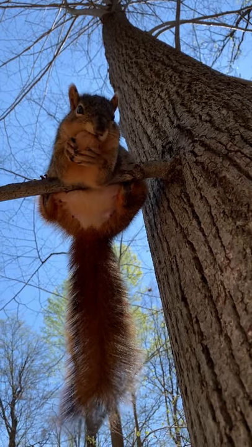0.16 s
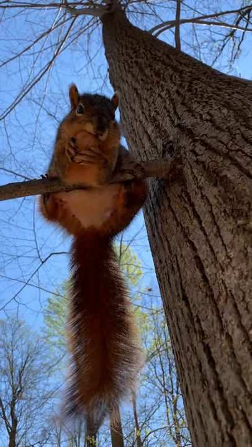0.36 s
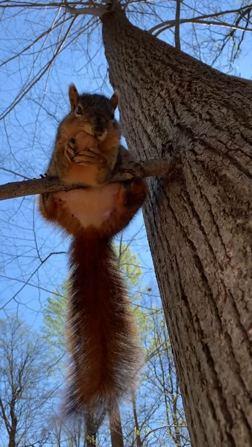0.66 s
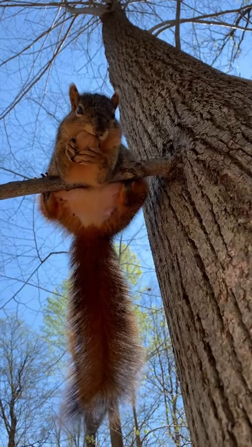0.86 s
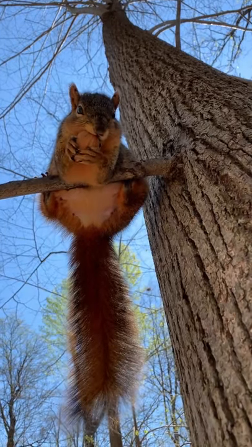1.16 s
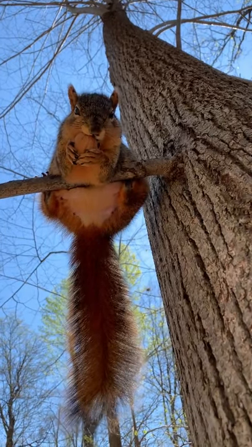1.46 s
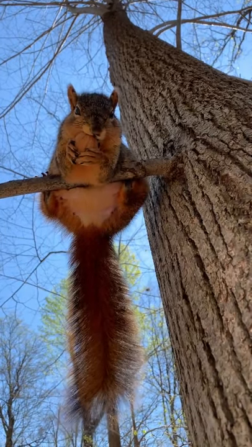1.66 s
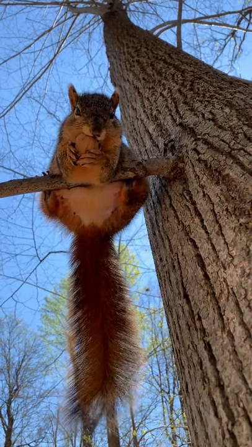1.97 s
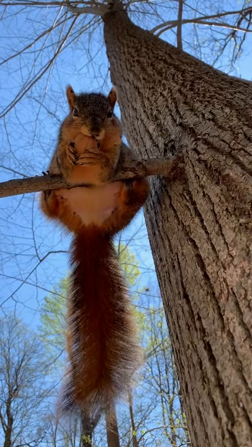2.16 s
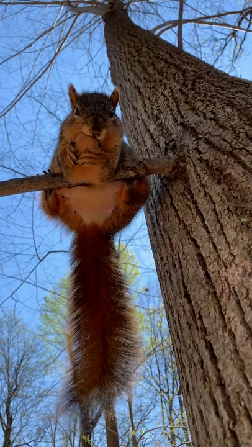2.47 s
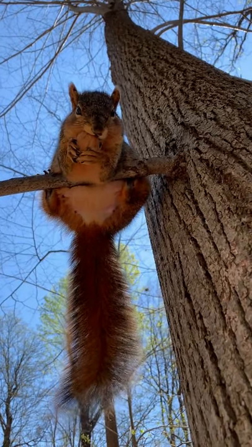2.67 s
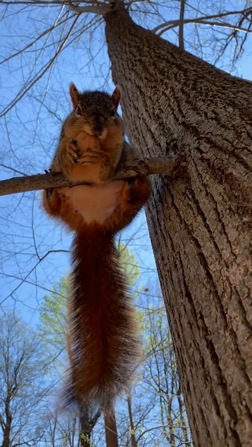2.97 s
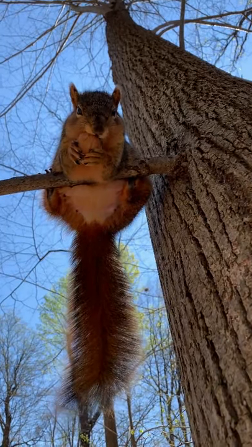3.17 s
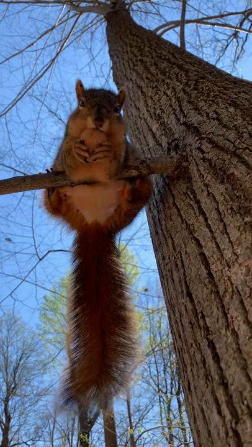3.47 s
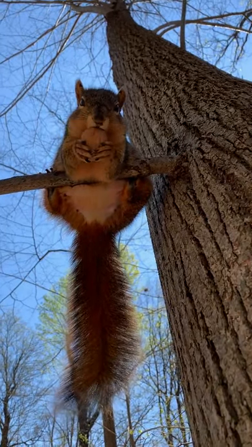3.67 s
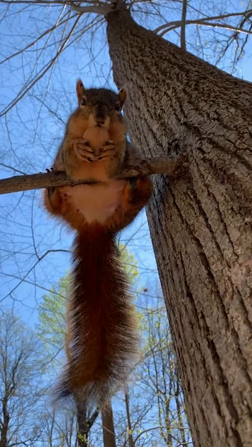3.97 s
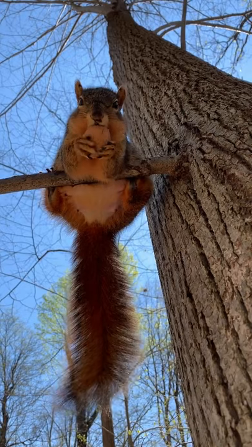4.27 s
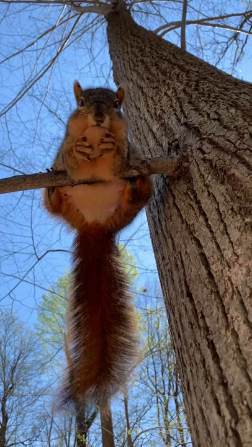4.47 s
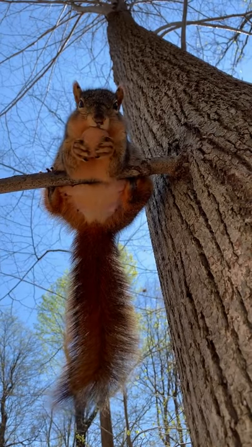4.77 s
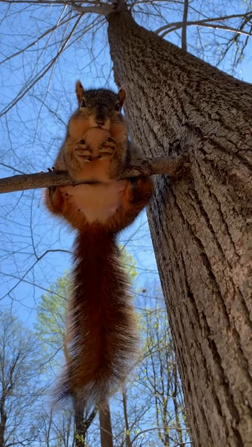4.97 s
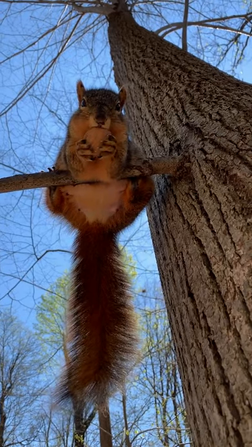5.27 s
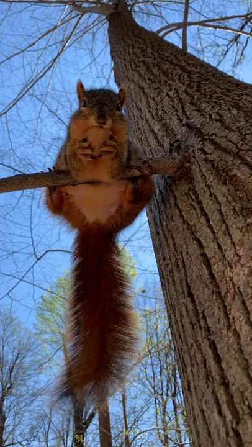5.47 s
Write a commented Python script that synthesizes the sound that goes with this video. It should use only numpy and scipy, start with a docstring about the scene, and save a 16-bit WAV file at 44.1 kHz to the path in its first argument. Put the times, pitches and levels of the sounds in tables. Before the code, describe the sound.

Loud, brittle nutshell snaps and tiny gritty bites very near the microphone, with distant bird calls and soft rumble in quiet woods.

```python
"""A nut is gnawed just above the microphones: four loud cracks of the shell and two light ones, small nibbles, chewing.
Behind lie a low rumble, a light breeze and far birds. Bites and cracks are fractures that ring a resonant shell;
birds are gliding tones and shaped noise; the rumble is filtered noise. The trunk and the woods return echoes.
A peak limiter ducks everything at peaks and lets the background recover slowly."""
import sys
import numpy as np
from scipy import signal
from scipy.fft import rfft, irfft
from scipy.io import wavfile
from scipy.ndimage import uniform_filter1d, minimum_filter1d

SR = 44100
rng = np.random.default_rng(int(sys.argv[2]) if len(sys.argv) > 2 else 0)


def file_out(sig):
    """Save sig as 16-bit WAV at sys.argv[1]."""
    # one column per channel
    cols = np.atleast_2d(sig).T
    # limit, then scale
    lim = np.clip(cols, -1, 1)
    pcm = np.round(lim * 32767).astype(np.int16)
    wavfile.write(sys.argv[1], SR, pcm)


N = 247842
TIME = np.arange(N) / SR
RUN_UP_SAMPLES = 600  # fractures kept before each snap

# shell splits: t/s, crumbling time/s, crunch level/dB, echo level/dB, factor on the shell's pitches,
# knock f/Hz, knock width/Hz, knock level/dB, then level/dB of each of the five shell modes
CRACK_ROWS = [(0.5294, 0.0021, -10.5, -22.5, 1.015, 1820, 744, 14, 7, 8, -1.5, 1, -9),
              (1.5162, 0.002, -7, -14.5, 1.015, 2080, 620, 19.5, 21.5, 25, 10.5, 18, 0),
              (2.2319, 0.0017, -5, -26.5, 0.98, 1216, 905, 12, 3, -17, -9.5, 0, -18),
              (3.1676, 0.0011, -4.5, -12, 0.97, 2320, 786, 21, 22, 26.5, 11.5, 25, 18.5),
              (4.1763, 0.0022, 1.5, -28, 0.95, 2210, 700, -13, -16, -1, -40, -32, -34),
              (4.7779, 0.0047, -1.5, -33, 1.29, 2026, 324, -2.5, -11, -19.5, -25, -34, -42.5)]


def gain_of(db):
    """Decibels to an amplitude factor."""
    return 10 ** (np.asarray(db) / 20)


def evened(x):
    """Scales to rms 1."""
    return x / np.sqrt(np.mean(x ** 2) + 1e-20)


def read(points, hz):
    """Interpolates (f/Hz, value) points on a log-frequency axis."""
    f, value = np.transpose(points)
    return np.interp(np.log(hz + 1), np.log(f + 1), value)


def add(mix, s, sound):
    """Lays a sound into the mix at time s."""
    part = mix[max(round(s * SR), 0):][:len(sound)]
    part += sound[:len(part)]


def hump(hz, centre, width):
    """Gain of a steep resonance: 1 at its centre, dark far below it."""
    detuning = (hz ** 2 - centre ** 2) / (1.43 * width * (hz + 1))
    return 1 / (1 + detuning ** 2)


def ring(modes, hollows=(), size=2048):
    """Minimum-phase response to one tiny fracture: (f/Hz, width/Hz, level/dB) modes, (f/Hz, width/Hz) hollows."""
    hz = abs(np.fft.fftfreq(size, 1 / SR))
    power = sum((gain_of(db) * hump(hz, f, width)) ** 2 for f, width, db in modes)
    for f, width in hollows:
        power = power * (1 - .75 * hump(hz, f, width)) ** 2
    log_gain = .5 * np.log(power + 1e-10)
    spectrum = np.exp(np.conj(signal.hilbert(log_gain)))
    return np.fft.ifft(spectrum).real[:size // 2]


def crumble(seconds, share, per_s, onset=0.11):
    """One snap amid small fractures (a share of the energy, at most .97): a short soft onset and a longer decay."""
    t = np.arange(-RUN_UP_SAMPLES, SR // 12) / SR
    sizes = rng.standard_normal(len(t)) * (rng.random(len(t)) < per_s / SR)
    distance_s = np.maximum(t, -t / onset)  # onset: its time over the decay time
    train = sizes * np.exp(-distance_s / (2 * seconds + 1e-4))
    share = np.clip(share, 0, .97)
    train *= np.sqrt(share) / (np.linalg.norm(train) + 1e-12)
    train[RUN_UP_SAMPLES] += np.sqrt(1 - share)
    return train


def grains(per_s, spread_db, modes):
    """A steady stream of tiny fractures of uneven size, rms 1."""
    sizes = gain_of(spread_db * np.minimum(rng.exponential(1, N), 3)) * rng.choice([-1, 1], N)
    hits = sizes * (rng.random(N) < per_s / SR)
    return evened(signal.oaconvolve(hits, ring(modes))[:N])


def band_noise(centre, width):
    """Noise in one resonance, rms 1."""
    hz = np.fft.rfftfreq(N, 1 / SR)
    spectrum = rfft(rng.standard_normal(N)) * hump(hz, centre, width)
    return evened(irfft(spectrum, N))


def swells(rows):
    """Smooth rises and falls: (centre t/s, length/s between 1/e points, level/dB) rows."""
    return sum(gain_of(db) * np.exp(-(2 * (TIME - s) / length) ** 2) for s, length, db in rows)


def rumble():
    """Filtered noise: distant rumble and wash, nearly mono in the bass, its level wavering a little."""
    # spectrum before scaling to rms 1: f/Hz, density/dB per Hz
    air = [(18, -47), (30, -15.5), (48, 2), (115, -1.5), (160, -9.5), (260, -12), (500, -21), (1100, -23),
           (2000, -33), (3000, -46), (5000, -60.5), (8000, -57), (11500, -60.5), (15400, -63),
           (16300, -71.5)]
    # correlation of the two microphones: f/Hz, correlation (-1 to 1)
    likeness = [(60, .93), (130, .93), (240, 0.9), (480, .55), (950, 0.3), (1900, 0.2), (3500, -.4),
                (8000, .4)]
    # balance: f/Hz, left minus right/dB
    balance = [(60, -0.5), (200, -2.5), (380, -6.5), (700, -3), (1300, -1), (4400, -0.5)]
    air_db, waver_db = -38.5, .5
    hz = np.fft.rfftfreq(N, 1 / SR)
    left, other = rfft(rng.standard_normal((2, N)))
    same = read(likeness, hz)
    right = same * left + np.sqrt(1 - same ** 2) * other
    tilt_db = np.array([[.5], [-.5]]) * read(balance, hz)
    pair = np.array([left, right]) * gain_of(read(air, hz) + tilt_db)
    drift = uniform_filter1d(rng.standard_normal(N), size=4000)
    waver = evened(uniform_filter1d(drift, size=4000))
    return gain_of(air_db) * evened(irfft(pair, N)) * gain_of(waver_db * waver)


def breeze():
    """Puffs on the microphone: short swells of narrow low noise."""
    # puffs: centre t/s, length/s, level/dB
    puffs = [(.03, 0.13, -27.5), (.125, 0.05, -28.5), (.21, 0.051, -26.5), (2.94, 0.043, -30.5)]
    return swells(puffs) * band_noise(centre=63.5, width=20.6)


def song(notes, pitch, partials=((1, 0),), waver=0.0038):
    """Repeats a gliding tone, louder towards its end, varying in pitch, length and colour."""
    out = np.zeros(N)
    for s, db in notes:
        jitter = np.array([[.06], [.008]]) * rng.standard_normal((2, 1))  # length, pitch
        at, hz = np.transpose(pitch) * (1 + jitter)
        t = np.arange(0, at[-1], 1 / SR)
        drift = evened(uniform_filter1d(rng.standard_normal(SR // 4), size=200))[:len(t)]
        turns = np.cumsum(np.interp(t, at, hz) * (1 + waver * drift)) / SR
        tone = 0
        for k, partial_db in partials:
            colour = gain_of(partial_db + 2 * rng.standard_normal())
            tone = tone + colour * np.sin(2 * np.pi * k * turns)
        envelope = np.hanning(len(t)) ** .5 * (t / t[-1] + 0.49)
        add(out, s, gain_of(db) * evened(tone * envelope))
    return out


def yelps():
    """Hoarse yelps rise, then drop off; only the third and fourth harmonics carry this far."""
    # yelps: t/s, factor on the pitch, level/dB before distance loss, fourth against third harmonic/dB
    yelp_rows = [(.171, .975, -64, -7), (.352, .97, -62.5, -1), (.531, 1.01, -62, -8), (.708, 1, -61, -7),
                 (.886, .995, -63.5, -12), (1.066, .995, -63, -9), (1.247, .99, -64, -12)]
    # fundamental through one yelp: t/s, f/Hz
    yelp_pitch = [(0, 580), (.04, 652), (.072, 690), (.083, 682), (.098, 570)]
    out = np.zeros(N)
    for s, factor, db, fourth_db in yelp_rows:
        out += song([(s, db)], np.array(yelp_pitch) * [1, factor], [(3, 0), (4, fourth_db)], waver=.009)
    return out


def rasps():
    """A far bird's short rasp: two swells of band noise."""
    # swells: centre t/s, length/s, level/dB before distance loss
    rasp_rows = [(1.86, 0.1, -64), (1.96, 0.056, -69)]
    return swells(rasp_rows) * band_noise(centre=3050, width=620)


def slurs(count=7):
    """An even run of falling whistles in a crescendo, their pitch blurred by distance."""
    # pitch through one slur: t/s, f/Hz
    slur_pitch = [(0, 4680), (.013, 4000), (0.023, 3276), (.034, 2550)]
    from_s, every_s = 4.461, .167
    first_db, rise_db_per_s = -76, 4  # before distance loss
    after_s = every_s * np.arange(count)
    return song(zip(from_s + after_s, first_db + rise_db_per_s * after_s), slur_pitch, waver=.06)


def chips():
    """Two short chips, perhaps a bird: quick swells of band noise."""
    # chips: centre t/s, length/s, level/dB
    chip_rows = [(3.3292, .003, -52), (3.347, .0045, -50)]
    return swells(chip_rows) * band_noise(centre=3800, width=1100)


def debris():
    """Crumbs crackle on after each split: fracture grains dying away, level tied to the split's echo level."""
    below_echo_db, decay_s = -38, .028
    fall = np.zeros(N)
    for s, _, _, echo_db, *_ in CRACK_ROWS:
        fall += gain_of(echo_db + below_echo_db) * (TIME > s) * np.exp(-abs(TIME - s) / decay_s)
    return fall * grains(per_s=260, spread_db=2.5, modes=[(2400, 1400, -1), (7200, 4000, 0), (12500, 4500, -2)])


def rustles():
    """Gritty rustles, swells of dense bright fractures: crumbs after a crack, teeth dragged over the shell."""
    # rustles: centre t/s, length/s, level/dB
    rustle_rows = [(3.19, 0.026, -41), (3.215, 0.03, -53), (3.28, 0.055, -54.5), (3.84, 0.017, -56.5),
                   (4.04, 0.07, -72), (5.415, 0.032, -58)]
    return swells(rustle_rows) * grains(per_s=2200, spread_db=0.5, modes=[(7060, 8300, -9), (12720, 4200, -5.0)])


def crumb_chewing():
    """Sparse ticks of chewed crumbs under a moving level."""
    # level curve: t/s, level/dB
    chewing_level = [(0, -92), (4.1, -87), (5.1, -85), (5.25, -81), (5.5, -81), (5.62, -86)]
    ticks = grains(per_s=62, spread_db=2.0, modes=[(2230, 1200, 0.0), (7200, 830, 5.5), (13000, 4000, -11.0)])
    return gain_of(np.interp(TIME, *np.transpose(chewing_level))) * ticks


def bite(seconds, ring_hz, ring_db, knock_hz, knock_db, fizz_db):
    """Fractures knock the nut, ring its shell and fizz; the longer the bite, the more of it is grit."""
    modes = [(knock_hz, 1300, knock_db), (ring_hz, 870, ring_db), (11980, 3300, fizz_db)]
    snap_s = 0.00051  # at this length grit and snap share the energy equally
    grit_share = seconds ** 2 / (seconds ** 2 + snap_s ** 2)
    return signal.fftconvolve(crumble(seconds, grit_share, per_s=3400), ring(modes))


def chews():
    """The jaw closes on crumbs: quick, uneven strokes, each a soft bite."""
    # strokes: t/s, ring level/dB, knock level/dB
    chew_rows = [(4.574, -29.5, -22), (4.665, -34, -21), (4.696, -41, -18.5), (4.739, -32, -20.5),
                 (4.904, -32.5, -33), (5.17, -35, -33), (5.219, -24.5, -22.5), (5.242, -26, -31),
                 (5.332, -27, -27), (5.378, -30, -20.5), (5.504, -31, -33), (5.534, -29.5, -21)]
    out = np.zeros(N)
    for s, ring_db, knock_db in chew_rows:
        stroke = bite(0.00099, 6920, ring_db, knock_hz=2000, knock_db=knock_db, fizz_db=-42)
        add(out, s - RUN_UP_SAMPLES / SR, stroke)
    return out


def nibbles():
    """Teeth chip the shell: short bites are single ticks, longer ones break up into grit."""
    # bites: t/s, crumbling time/s, ring f/Hz, ring level/dB, knock f/Hz, knock level/dB, fizz level/dB
    nibble_rows = [(.562, 0.0034, 7000, -26, 2000, -20, -35), (.585, 0.0024, 6600, -24, 2200, -31, -29),
                   (0.7062, 0.0004, 5250, -20.5, 1250, -12, -35),
                   (1.1033, 0.0016, 6900, -14, 2400, -14.5, -27),
                   (1.112, 0.0022, 6960, -15, 2300, -16, -36),
                   (1.1468, 0.0026, 5200, -9.5, 2230, -9.5, -25),
                   (1.1543, 0.0014, 6500, -13, 2490, -16, -18.5),
                   (1.2644, 0.0011, 5860, -18, 2230, -14, -34), (1.4948, 0.00035, 5470, -25, 2100, -7, -45),
                   (1.5199, 0.0007, 7000, -4, 2100, 6, -10), (1.5219, 0.00055, 6000, 0, 2370, 7, 1),
                   (1.5515, .0006, 7000, -18, 2300, -23, -24), (1.559, 0.003, 7480, -18, 2210, -21, -32),
                   (1.7142, 0.00045, 5840, -17, 1800, -7.5, -52.5),
                   (1.7904, 0.002, 5360, -18.5, 3080, -22.5, -33),
                   (1.926, 0.0013, 6440, -26, 2200, -18, -27.5),
                   (2.103, 0.0025, 6700, -24, 2070, -14.5, -51),
                   (2.269, 0.0043, 6300, -17, 2200, -19.5, -31),
                   (2.646, 0.0078, 6640, -19, 1690, -11.5, -44.5),
                   (2.7504, 0.00058, 6550, -29, 1390, -13, -44),
                   (2.981, 0.0087, 6800, -23.5, 2150, -17.5, -43),
                   (3.2065, .0006, 7500, -19, 2400, -24, -21.5), (3.217, .001, 6500, -23, 2400, -16.5, -27),
                   (3.290, .0005, 6400, -22, 2300, -35, -16),
                   (3.3113, 0.00053, 7050, -20, 2310, -31.5, -30),
                   (3.3415, 0.0015, 7000, -30, 2300, -30.5, -42),
                   (3.8465, 0.0004, 6600, -18, 2000, -22.5, -17),
                   (4.1784, 0.00066, 5200, -10.5, 2200, -17, -26.5),
                   (4.1838, 0.0007, 6200, -14, 1980, -20, -27.5),
                   (4.227, 0.0013, 6840, -31, 2300, -28, -36), (4.318, 0.012, 6900, -25, 2220, -19.5, -33),
                   (4.783, 0.0032, 6700, -24, 1990, -14.5, -42),
                   (4.7935, 0.0019, 7200, -23.5, 2200, -19, -40),
                   (5.0643, 0.0012, 6970, -25, 2176, -23.5, -33),
                   (5.074, 0.0014, 7000, -23.5, 2200, -22, -37.5),
                   (5.3852, 0.0054, 7350, -26, 2190, -23, -34), (5.41, .003, 7060, -20, 2200, -27, -21),
                   (5.42, .001, 7200, -23, 2200, -31, -35), (5.431, 0.0013, 7150, -23, 2200, -27, -45),
                   (5.4402, 0.00097, 6780, -8.5, 2120, -18.5, -18.5)]
    out = np.zeros(N)
    for s, *shape in nibble_rows:
        add(out, s - RUN_UP_SAMPLES / SR, bite(*shape))
    return out


def cracks_outward():
    """Splits as they reach the woods: over all directions the shell's modes blur into one broad snap."""
    # broad modes: f/Hz, width/Hz, level/dB
    spread = [(2100, 2200, 6.5), (5700, 5000, -2), (12000, 6000, -8.5)]
    out = np.zeros(N)
    for s, _, _, echo_db, *_ in CRACK_ROWS:
        add(out, s, gain_of(echo_db) * ring(spread))
    return out


def cracks():
    """Each snap knocks the nut and rings the shell; the crunch round it is too fine to stir the low knock."""
    # shell modes before the pitch factor: f/Hz, width/Hz
    shell = [(2880, 350), (5500, 880), (7300, 1600), (11500, 1820), (14600, 1200)]
    # hollows where the shell's faces cancel, f before the pitch factor: f/Hz, width/Hz
    hollow_rows = [(2480, 120), (4150, 90)]
    out = np.zeros(N)
    fine = signal.butter(2, 3200, "high", fs=SR)
    for s, seconds, crunch_db, _, scale, knock_hz, knock_width, knock_db, *mode_db in CRACK_ROWS:
        modes = [(f * scale, width, db) for (f, width), db in zip(shell, mode_db)]
        modes.append((knock_hz, knock_width, knock_db))
        body = ring(modes, [(f * scale, width) for f, width in hollow_rows])
        crunch = crumble(seconds, share=1, per_s=20000, onset=0.3)
        force = gain_of(crunch_db) * signal.lfilter(*fine, crunch)
        force[RUN_UP_SAMPLES] += 1
        add(out, s - RUN_UP_SAMPLES / SR, signal.fftconvolve(force, body))
    return out


def near(x):
    """Direct sound and tree echoes bend round the recorder's body to its two ports."""
    # echoes off branch and trunk: delay/s, level/dB
    trunk = [(.0029, -20), (.0056, -28)]
    # phase between the ports: f/Hz, left lead/rad
    port_phase = [(100, 0), (1500, -.5), (2700, -.1), (3700, -2.4), (4500, -3.6), (5700, -2.4), (7200, -.9),
                  (9300, .5), (10500, 2.5), (12300, 4.3), (14500, 6.2)]
    # shading by the body: f/Hz, left minus right/dB
    shade = [(2400, 0), (3100, -4), (4100, 9), (5000, 2), (9200, 1), (10200, 7), (11200, 2)]
    hz = np.fft.rfftfreq(N, 1 / SR)
    paths = 1 + sum(gain_of(db) * np.exp(-2j * np.pi * hz * delay) for delay, db in trunk)
    left = gain_of(.5 * read(shade, hz)) * np.exp(.5j * read(port_phase, hz))
    return irfft(rfft(x) * paths * np.array([left, 1 / left]), N)


def woods(x, taps_per_s=5000):
    """Twigs, trunks and ground scatter a short echo in grainy clumps, its taps different at each microphone."""
    # echo envelope before scaling to unit energy: t/s after the sound, level/dB
    echo_level = [(0, -15), (.008, 1.5), (.02, 1), (.043, 0), (.06, -12), (.11, -26), (.3, -56)]
    clump_s, clump_db = .003, 3.2
    t = np.arange(SR // 3) / SR
    taps = rng.standard_normal((2, len(t))) * (rng.random((2, len(t))) < taps_per_s / SR)
    knots = np.arange(0, t[-1], clump_s)
    clumps = np.interp(t, knots, np.clip(rng.standard_normal(len(knots)), -1.5, 1.5))
    tail = taps * gain_of(np.interp(t, *np.transpose(echo_level)) + clump_db * clumps)
    tail /= np.linalg.norm(tail, axis=1, keepdims=True)
    return signal.fftconvolve(x[None], tail, axes=1)[:, :N]


def scene():
    """The gnawing is close, the birds far and echoing."""
    background = rumble() + breeze()
    far_birds = yelps() + rasps() + slurs()
    chip = chips()
    small = debris() + rustles() + crumb_chewing() + chews() + nibbles()
    echo = woods(cracks_outward() + gain_of(-17) * (small + chip) + gain_of(-10) * far_birds)
    return background + gain_of(-4.5) * far_birds + chip + echo + near(cracks() + small)


def record(dry, ceiling_db=1.06, recovery_s=0.15):
    """A peak limiter falls at once and recovers slowly; then a low-pass limits the band."""
    over_db = np.maximum(20 * np.log10(abs(dry).max(0) + 1e-9) - ceiling_db, 0)
    over_db = -minimum_filter1d(-over_db, size=90)  # looks a millisecond ahead
    fade = np.exp(-TIME / recovery_s)
    held_db = np.maximum.accumulate(over_db / fade) * fade
    limited = dry / gain_of(uniform_filter1d(held_db, size=60))
    low_pass = signal.firwin(401, 16500, window=("kaiser", 9), fs=SR)
    return signal.oaconvolve(limited, low_pass[None], "same")


dry = scene()
out = record(dry)
file_out(out)
```